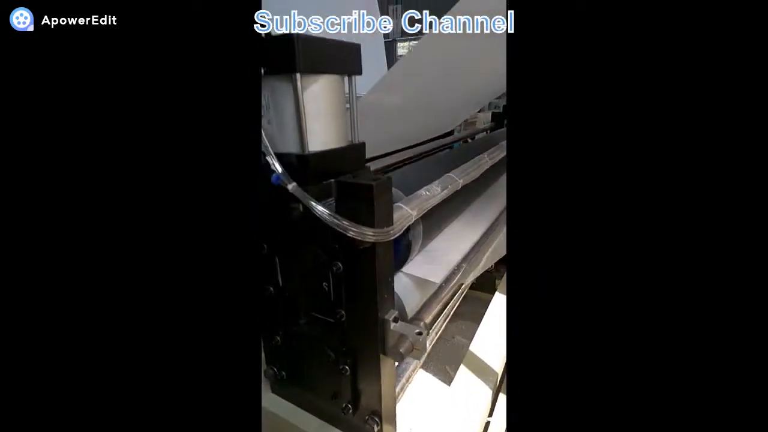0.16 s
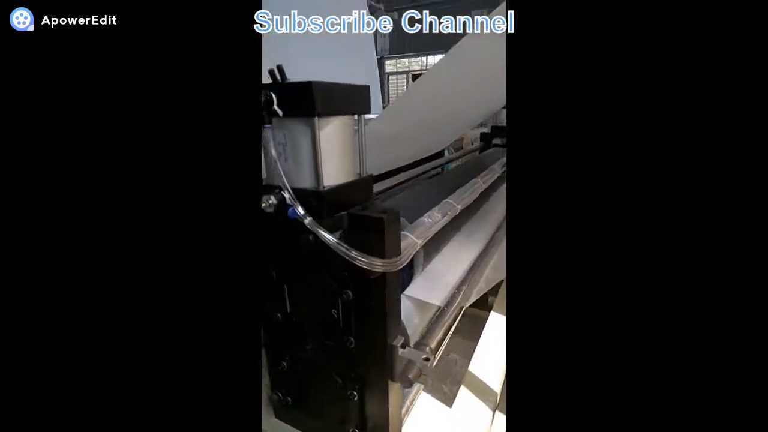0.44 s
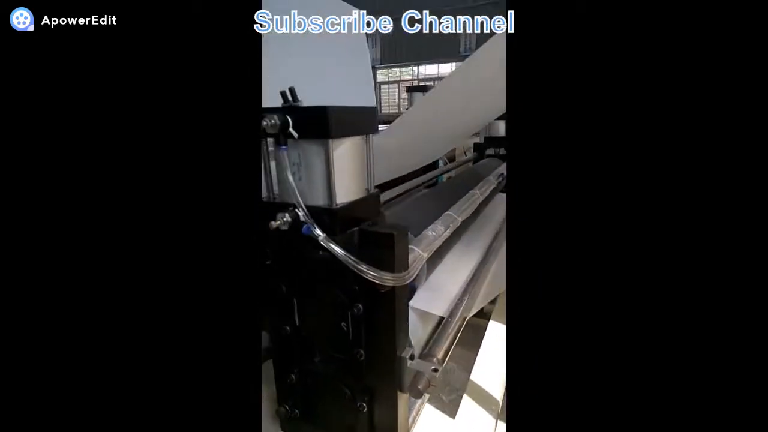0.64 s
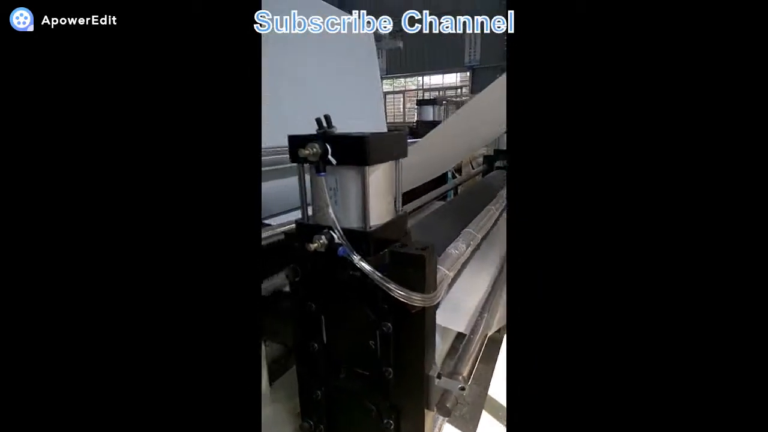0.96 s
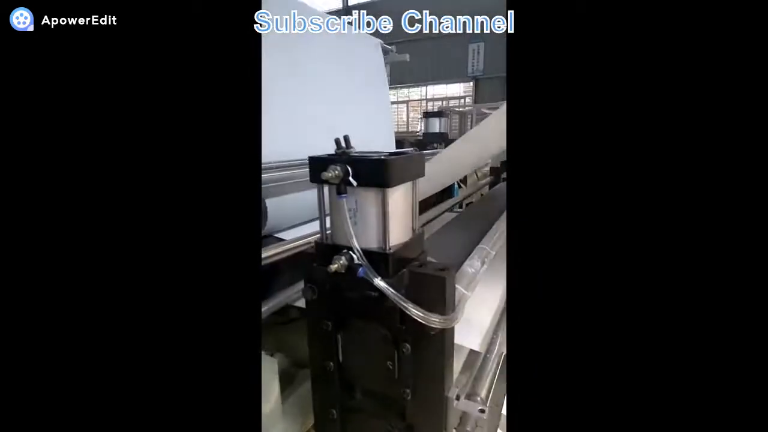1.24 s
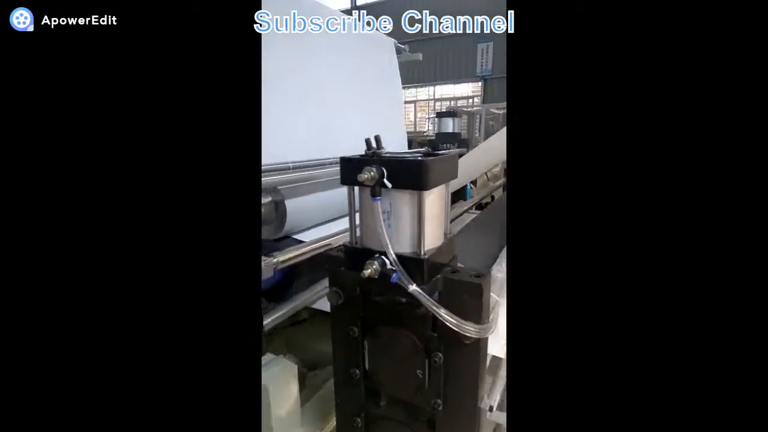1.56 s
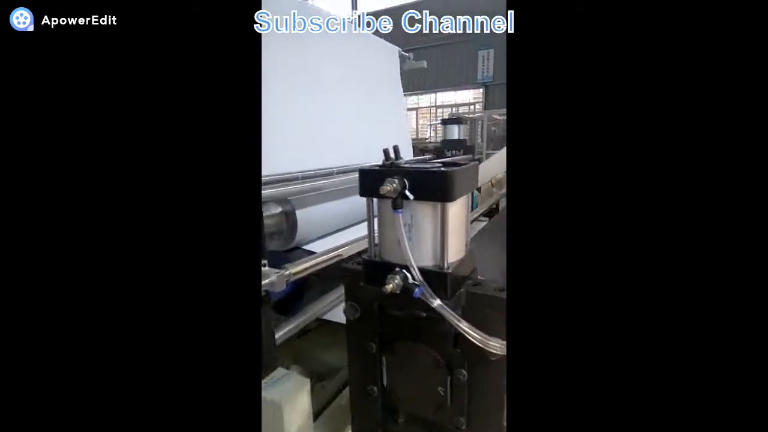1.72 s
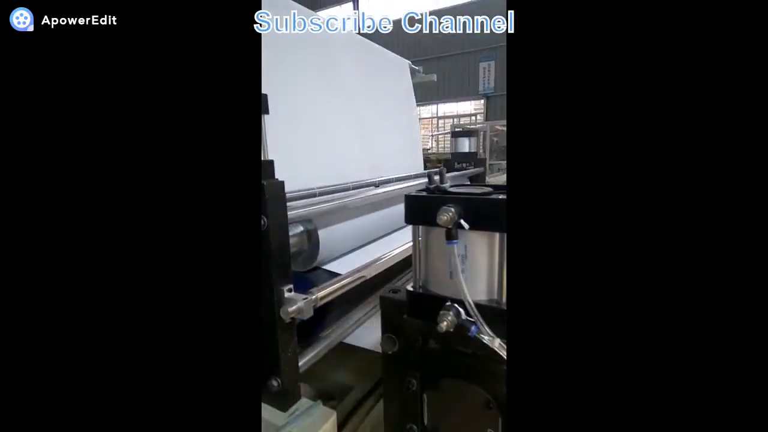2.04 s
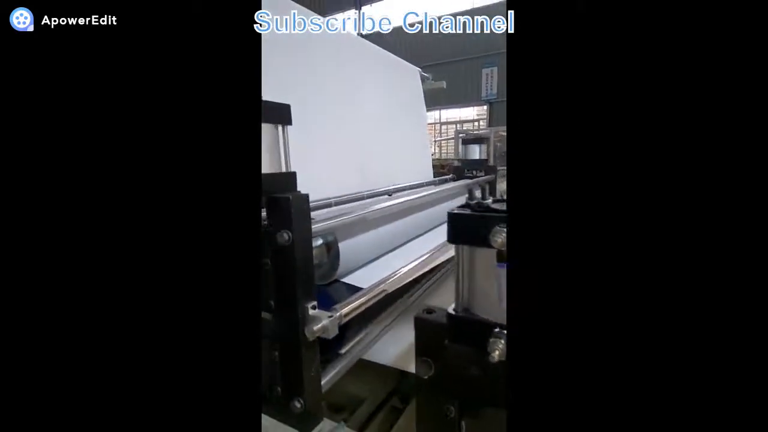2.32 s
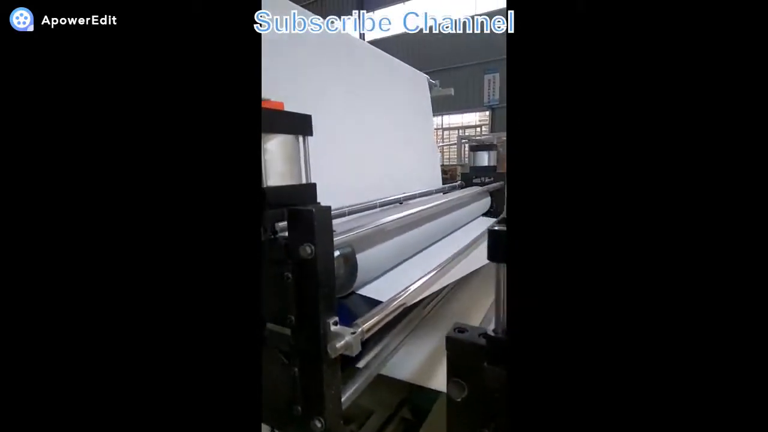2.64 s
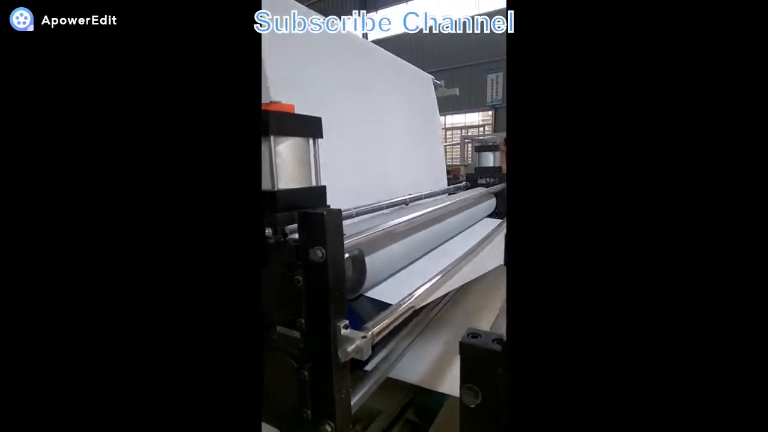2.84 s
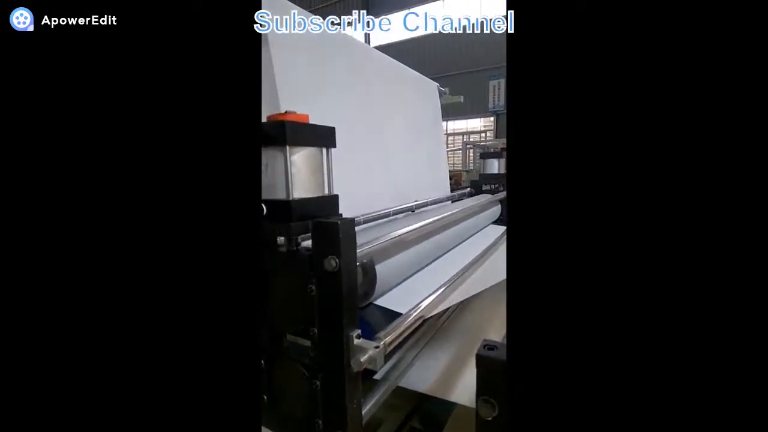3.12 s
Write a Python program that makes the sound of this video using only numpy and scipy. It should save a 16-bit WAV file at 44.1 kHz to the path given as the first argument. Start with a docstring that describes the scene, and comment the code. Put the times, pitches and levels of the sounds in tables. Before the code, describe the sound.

A paper folding machine clacks about seven times a second, each clack answered by a lighter metallic knock and papery swish, over motor hum and roller rumble in a factory hall, heard close by a moving microphone.

```python
"""In a factory hall, a tissue folding machine runs while the microphone moves along its side.
The rollers rumble as coloured noise with ticks; a motor hum and a thin inverter whine are wavering tones.
Seven times a second the folder clacks and knocks back: short noise bursts and ringing metal tones,
with a swish of paper made of grainy noise. Once, compressed air puffs out; dull thumps come from the frame."""
import sys
import numpy as np
from scipy import signal
from scipy.fft import rfft, irfft
from scipy.io import wavfile
from scipy.ndimage import uniform_filter1d

SR = 44100
rng = np.random.default_rng(int(sys.argv[2]) if len(sys.argv) > 2 else 0)


def to_wav(s):
    """Save 16-bit WAV."""
    ch = np.atleast_2d(s).T  # columns
    pcm = np.round(np.clip(ch, -1, 1) * 32767)  # PCM
    wavfile.write(sys.argv[1], SR, pcm.astype(np.int16))


N = 144648  # length in samples

# Rumble of the rollers and the hall. Each row: frequency in Hz, relative level in dB.
HALL_COLOUR = [(20, -32), (40, -11), (60, -14), (110, 4), (145, -3.5), (180, 2.5), (215, -7.5), (255, 1),
               (300, -6.5), (370, -0.5), (520, -5), (660, -6), (850, -10), (1400, -13), (2100, -14),
               (3000, -17.5), (4200, -20.5), (7000, -20.5), (8200, -32), (10000, -31.5), (13000, -29),
               (16000, -51)]
# Likeness of left and right. Each row: frequency in Hz, likeness from 0 to 1.
LEFT_RIGHT_LIKENESS = [(20, .98), (150, 0.88), (350, 0.9), (700, 0.51), (1400, 0), (3000, 0), (8000, 0.22),
                       (14000, 0.38)]
# Colour of the loose parts' ticks. Each row: frequency in Hz, relative level in dB.
RATTLE_COLOUR = [(200, -7), (400, -7), (700, -5), (1200, -2.5), (2300, -22), (4000, -19), (8000, -17),
                 (16000, -36)]
# Reverberation of the hall. Each row: frequency in Hz, time to fall by 60 dB in seconds.
ROOM_DECAY = [(200, 0.94), (2000, 0.72), (8000, 0.14), (16000, 0.37)]
# Midrange of rollers and blows as the microphone passes. Each row: time in seconds, level in dB.
MIDRANGE_LEVEL = [(0, 1.5), (.4, 0), (.7, 0), (1.2, 0), (1.45, -1), (2, -0.5), (2.6, -0.5), (3.28, -0.5)]
# A narrow moan in the rollers that comes and goes. Each row: time in seconds, level in dB.
MOAN_LEVEL = [(0, -42), (.15, -33), (.4, -32.5), (.85, -41), (1.12, -27.5), (1.45, -38), (1.78, -40),
              (1.96, -25.5), (2.15, -33), (2.35, -49), (3.28, -48)]
# The folding parts whirr between the blows, most at first. Each row: time in seconds, level in dB.
WHIRR_LEVEL = [(0, -32.5), (.6, -34), (1.3, -34), (3.28, -35.5)]
# Tones of the inverter. Each row: frequency in Hz, level in dB.
WHINE_TONES = [(7892, -42.5), (7963, -42), (8036, -47), (8109, -45)]
# Level of the whine along the way. Each row: time in seconds, level in dB.
WHINE_PATH = [(0, -23), (.35, 2), (.9, 1.5), (1.4, 0), (1.9, -1), (2.3, -0.5), (2.6, 0), (2.95, 2),
              (3.28, -7)]
# Other shafts droning in the frame. Each row: frequency in Hz, level in dB.
DRONE_TONES = [(80.2, -37), (92.3, -34.5), (99.4, -35.5), (101.7, -32)]
# Motor hum. Each row: multiple of the shaft rate, level in dB.
HUM_TONES = [(1, -29), (2, -10.5), (4, -38), (12, -45)]
# The main hum tone swells as the motor comes nearer. Each row: time in seconds, level in dB.
HUM_SWELL = [(0, -1), (.25, -0.8), (.48, 0.6), (1.05, 0.2), (1.35, 1), (1.53, 1.5), (2, 1.4), (2.5, 2),
             (3.28, 1.9)]
# Overtones of the hum that sing out of the frame, listed as multiples of the shaft rate.
OVERTONE_MULTIPLES = (7, 9, 10)
# Their levels along the way. Each row: time in seconds, then the level of each multiple in dB.
OVERTONE_PATH = [(0, -32, -49, -38), (.35, -29.5, -46, -39), (.8, -43, -44, -42), (1.05, -30.5, -32, -42),
                 (1.35, -31.5, -37.5, -44), (1.7, -38, -35, -41), (1.95, -36, -34, -31),
                 (2.2, -42, -33.5, -44), (2.75, -35, -35.5, -48), (3.28, -43, -35, -40)]
# Dull thumps in the frame. Each row: start in seconds, relative level in dB.
FRAME_THUMPS = [(.409, 1.5), (1.114, 5), (1.256, 2), (2.245, 4.5), (2.662, -8), (3.141, -2.5), (3.229, -3),
                (0.124, 1), (0.809, -2)]
# Colour of a thump. Each row: frequency in Hz, relative level in dB.
THUMP_COLOUR = [(80, -11), (180, 5), (280, 0), (480, -16), (800, -11), (2000, -53)]
# Colour of the air puff. Each row: frequency in Hz, relative level in dB.
PUFF_COLOUR = [(400, -26), (1200, -3.5), (2500, -4), (3700, 1.5), (5000, -4), (7000, 1.5), (9000, -5),
               (12000, -15), (16000, -15)]
# Spurts within the air puff. Each row: start in seconds, level in dB.
PUFF_SPURTS = [(2.814, -21), (2.823, -16), (2.83, -16), (2.839, -14), (2.859, -18)]
# Folding clacks. Each row: start in seconds, relative crack level in dB, relative ring level in dB,
# ring pitch in Hz, delay of the rebound in seconds, relative rebound level in dB.
FOLD_CLACKS = [(0.063, -6.5, -6, 2080, 0.016, -9), (0.206, -11, -1, 2100, 0.02, -3),
               (0.345, -5, -1.5, 1980, 0.018, -5), (0.485, -10, -2, 2110, 0.017, -5),
               (0.631, -6.5, 1.5, 2060, 0.019, -3), (0.77, -4.5, 0, 2050, 0.018, -5),
               (0.911, -4.5, 0.5, 2080, 0.015, -7), (1.054, -5, 3.5, 2055, 0.019, 0),
               (1.19, -4.5, -2.0, 1965, 0.02, -3.5), (1.332, -4, 2, 1983, 0.021, -12),
               (1.477, -3.5, 1.5, 2072, 0.017, -3), (1.613, -1, -0.5, 2060, 0.021, -3),
               (1.755, -3, -1.5, 1930, 0.021, -6), (1.898, 2.5, 1.5, 2040, 0.019, 1.0),
               (2.035, -4.5, 1.5, 1940, 0.023, -4), (2.177, -0.5, -3, 2080, 0.016, -5.5),
               (2.32, 0.5, 1, 2040, 0.022, 0), (2.459, -0.5, 2, 2040, 0.023, -2.5),
               (2.6, 2, -2, 2040, 0.016, -4.0), (2.741, 1.5, 2, 2096, 0.022, 1.5),
               (2.882, -1, 0, 1960, 0.022, -1), (3.023, 3, -2, 2210, 0.015, -4.0),
               (3.165, 0.5, 1, 2070, 0.022, 0.5)]
# Return knocks between the clacks. Each row: start in seconds, relative level in dB,
# ring pitch in Hz, relative bounce level in dB.
RETURN_KNOCKS = [(0.146,-4,2330,-2), (0.289,-4,2140,-8), (0.421,-6,2050,-6), (0.569,-6,2340,-6),
                 (0.708,-4,2210,-5), (0.846,-2.5,2140,-2), (0.99,-4,2350,-2.5), (1.129,-3,2180,-5),
                 (1.271,-2,2135,-5), (1.416,-2.5,2350,-8), (1.55,-1.5,2200,-5), (1.693,1,2270,-4),
                 (1.836,-2,2320,-1), (1.972,0.5,2150,-2.5), (2.119,1,2140,-4), (2.255,-2.5,2305,-1.5),
                 (2.395,-2,2210,-3), (2.537,2,2180,-3), (2.678,-2,2330,-1), (2.823,-6,2220,-10),
                 (2.96,2,2120,-4.5), (3.102,0,2290,-1), (3.241,-3,2150,-6)]
# Ringing of the folding parts. Each row: frequency in Hz before tuning to a blow, relative level
# at a clack in dB, relative level at a return in dB, time to fall by 60 dB in seconds.
RING_MODES = [(1400, -7, -11.5, 0.02), (1762, -0.5, -10.5, 0.025), (2040, 1, -3.5, 0.035),
              (2260, -12, 1.5, 0.031), (2453, -8, -4.5, 0.024), (2836, -7, -11.5, 0.044)]
# Colour of a clack's crack. Each row: frequency in Hz, relative level in dB.
CRACK_COLOUR = [(300, -18), (900, -13), (1600, 4), (3000, 1.5), (4300, 1), (5600, 3), (6600, -1),
                (7500, -7), (9000, -11.5), (11600, -8.5), (16000, -18)]
# Colour of the paper swish. Each row: frequency in Hz, relative level in dB.
SWISH_COLOUR = [(500, -25), (1500, 4), (3000, 8), (6500, 11), (8500, 11), (11000, -2.5), (16000, -44)]

HALL_DB, RATTLE_DB, ROOM_DB = -20, -37, -14.5
RATTLE_PER_S, RATTLE_SPREAD_DB = 140, 6
MOAN_HZ, MOAN_WIDTH_HZ, MOAN_WANDER_HZ = 653.5, 9, 7.04
WHIRR_HZ, WHIRR_WIDTH_HZ = 2250, 290
WHINE_HISS_HZ, WHINE_HISS_WIDTH_HZ, WHINE_HISS_DB = 8070, 110, -39.5
SHAFT_HZ = 62.955
THUMP_DB, PUFF_DB, PUFF_S = -20, -19.3, 2.806
# levels of the folder's parts, to which each blow's own level is added
CRACK_DB, SNAP_DB, RING_DB, REBOUND_DB, RETURN_DB = -21.5, -18.5, -23, -20, -21
RATTLE_ON_DB = -26  # the rattle after a clack
FEED_DB, SWISH_DB = -27.5, -28
SNAP_GAP_S, SECOND_SNAP_DB = .0042, -4
STRIKE_S, CHATTER = .0032, .48  # fall time and share of the chatter in a blow
PEAK_KNEE, PEAK_CEILING = .8, .96  # sample values where rounding starts and levels out
EDGE_HZ = 15900


def amp(db):
    """Turns decibels into gain."""
    return 10 ** (np.asarray(db) / 20)


def unit(x):
    """Scales a sound to an average strength (rms) of 1."""
    return x / np.sqrt(np.mean(x ** 2) + 1e-20)


def read(points, hz):
    """Reads a table between its rows, along a logarithmic frequency axis."""
    f, value = np.transpose(points)
    return np.interp(np.log(hz + 1), np.log(f + 1), value)


def gain_over_time(points):
    """Turns a table of times and decibels into a gain for every sample."""
    return amp(np.interp(np.arange(N) / SR, *np.transpose(points)))


def add(mix, s, sound):
    """Mixes in a stereo sound, starting at s seconds."""
    part = mix[:, max(round(s * SR), 0):][:, :sound.shape[1]]
    part += sound[:, :part.shape[1]]


def drift(rate_hz):
    """Makes a slow random wander of rms 1, by keeping only the low frequencies of noise."""
    hz = np.fft.rfftfreq(N, 1 / SR)
    slow = np.exp(-(hz / rate_hz) ** 2) * (hz > 0)
    return unit(irfft(rfft(rng.standard_normal(N)) * slow, N))


def colour(x, spectrum):
    """Gives two unrelated channels a spectrum and makes left and right partly alike."""
    hz = np.fft.rfftfreq(x.shape[1], 1 / SR)
    a, b = rfft(x) * amp(read(spectrum, hz))
    same = np.clip(read(LEFT_RIGHT_LIKENESS, hz), -1, 1)
    mid, side = a * np.sqrt(1 + same), b * np.sqrt(1 - same)
    return unit(irfft(np.array([mid + side, mid - side]), x.shape[1]))


def band(centre_hz, width_hz):
    """Makes stereo noise in one narrow resonance."""
    hz = np.fft.rfftfreq(N, 1 / SR)
    peak = 1 / (1 + ((hz - centre_hz) / width_hz) ** 4)
    return colour(irfft(rfft(rng.standard_normal((2, N))) * peak, N), HALL_COLOUR)


def tone(hz, waver, wander):
    """Makes a steady tone that wavers in level and wanders in phase."""
    angle = 2 * np.pi * (hz * np.arange(N) / SR + rng.random())
    level = np.sqrt(2) * (1 + waver * drift(18))
    return level * np.sin(angle + wander * drift(2.7))


def burst(spectrum, rise, hold, fall, grain_db=0):
    """Makes coloured noise, grainy if asked, that rises, holds and dies away (times in seconds)."""
    t = np.arange(SR // 2) / SR
    grains = unit(uniform_filter1d(rng.standard_normal(len(t)), size=48))
    noise = amp(grain_db * np.tanh(grains)) * rng.standard_normal((2, len(t)))
    shape = np.minimum(t / rise, 1) * np.exp(-np.maximum(t - rise - hold, 0) / fall)
    return shape * colour(noise, spectrum)


def ring(levels_db, top_hz, scatter=.02):
    """A blow and a short chatter set the folding parts ringing, the strongest tone near top_hz."""
    t = np.arange(SR // 8) / SR
    hz, _, _, t60 = np.transpose(RING_MODES)[:, :, None]
    hz = hz * top_hz / hz[np.argmax(levels_db)]
    hz = hz * (1 + scatter * rng.standard_normal(hz.shape))
    # the phases differ between left and right
    phase = rng.uniform(0, 2 * np.pi, hz.shape) + .9 * rng.standard_normal((2, *hz.shape))
    fading = amp(levels_db[:, None] - 60 * t / t60)
    modes = (fading * np.sin(2 * np.pi * hz * t + phase)).sum(1)
    modes *= np.minimum(t / .001, 1)  # soft start over 1 ms
    chatter = rng.standard_normal((2, len(t))) * np.exp(-t / STRIKE_S)
    contact = (t == 0) + CHATTER * chatter / np.linalg.norm(chatter[0])
    out = signal.fftconvolve(modes, contact, axes=1)[:, :len(t)]
    return out / np.sqrt(np.mean(out[:, :SR // 200] ** 2))  # rms 1 over the first 5 ms


def room(x):
    """The hall's echoes blur into a noise tail that dies at its own speed in each pitch range."""
    hz, t, z = signal.stft(rng.standard_normal((2, SR // 2)), SR, nperseg=256)
    fading = amp(-60 * t / read(ROOM_DECAY, hz)[:, None])
    tail = signal.istft(z * fading, SR, nperseg=256)[1]
    return signal.fftconvolve(x, tail / np.linalg.norm(tail[0]), axes=1)[:, :N]


def uneven(x, patchy_db=2):
    """The midrange follows the microphone's path and the treble flickers in small patches."""
    hz, t, z = signal.stft(x, SR, nperseg=512)
    # how strongly each frequency takes part: (Hz, share)
    middle = read([(180, 0), (380, 1), (1400, 1), (3500, 0)], hz)[:, None]
    treble = read([(1000, 0), (4000, .6), (9000, 1.4)], hz)[:, None]
    patches = rng.standard_normal((len(t), len(hz))).T
    patches = uniform_filter1d(patches, size=4, axis=0)
    patches = unit(uniform_filter1d(patches, size=9, axis=1))
    change_db = middle * np.interp(t, *np.transpose(MIDRANGE_LEVEL)) + treble * patchy_db * patches
    return signal.istft(z * amp(change_db), SR, nperseg=512)[1][:, :N]


def rollers(flutter_db=.55):
    """The running rollers rumble and hiss as fluttering coloured noise."""
    rumble = colour(rng.standard_normal((2, N)), HALL_COLOUR)
    return amp(HALL_DB) * rumble * amp(flutter_db * drift(75))


def loose_parts(tick_s=.0015):
    """Loose parts tick at random moments, each tick a tiny noise that dies away."""
    sizes = np.minimum(rng.exponential(1, N), 2)
    ticks = (rng.random(N) < RATTLE_PER_S / SR) * amp(RATTLE_SPREAD_DB * sizes)
    shape = signal.lfilter([1], [1, -np.exp(-1 / (tick_s * SR))], ticks)
    return amp(RATTLE_DB) * colour(shape * rng.standard_normal((2, N)), RATTLE_COLOUR)


def moan():
    """A narrow resonance in the rollers moans, its pitch wandering a little."""
    wander = np.exp(2j * np.pi * np.cumsum(MOAN_WANDER_HZ * drift(3.9)) / SR)
    shifted = (signal.hilbert(band(MOAN_HZ, MOAN_WIDTH_HZ)) * wander).real
    return shifted * gain_over_time(MOAN_LEVEL)


def whirr():
    """The folding parts whirr as a wider band of noise between the blows."""
    return band(WHIRR_HZ, WHIRR_WIDTH_HZ) * gain_over_time(WHIRR_LEVEL)


def inverter(balance_db=1.2):
    """The inverter whines: a cluster of slightly wavering high tones in a narrow hiss."""
    lines = np.array([sum(amp(db) * tone(hz, .25, .6) for hz, db in WHINE_TONES) for side in range(2)])
    hiss = amp(WHINE_HISS_DB) * band(WHINE_HISS_HZ, WHINE_HISS_WIDTH_HZ)
    return (lines + hiss) * gain_over_time(WHINE_PATH) * amp([[balance_db], [-balance_db]])


def motor(balance_db=.42):
    """The motor hums at multiples of its shaft rate, most at twice; other shafts drone along."""
    out = np.zeros(N)
    for multiple, db in HUM_TONES:
        if multiple == 2:  # the main tone is steadier and swells
            out += amp(db) * gain_over_time(HUM_SWELL) * tone(multiple * SHAFT_HZ, .0074, .017)
        else:
            out += amp(db) * tone(multiple * SHAFT_HZ, .19, .35)
    times, *levels = np.transpose(OVERTONE_PATH)
    for multiple, db in zip(OVERTONE_MULTIPLES, levels):
        out += gain_over_time(np.transpose([times, db])) * tone(multiple * SHAFT_HZ, .33, .48)
    for hz, db in DRONE_TONES:
        out += amp(db) * tone(hz, .53, .9)
    return out * amp([[-balance_db], [balance_db]])


def thumps():
    """A few dull thumps in the frame, each a short burst of low noise."""
    out = np.zeros((2, N))
    for s, db in FRAME_THUMPS:
        add(out, s, amp(THUMP_DB + db) * burst(THUMP_COLOUR, .002, .0041, .0064))
    return out


def air_puff():
    """Compressed air puffs out once: a grainy hiss that splutters in short spurts."""
    out = np.zeros((2, N))
    add(out, PUFF_S, amp(PUFF_DB) * burst(PUFF_COLOUR, .015, .045, .09, grain_db=3.5))
    for s, db in PUFF_SPURTS:
        add(out, s, amp(db) * burst(PUFF_COLOUR, .001, .003, .003))
    return out


def clacks():
    """In each cycle paper feeds in, then the folder cracks, snaps twice, rings and rebounds."""
    out = np.zeros((2, N))
    clack_db = np.transpose(RING_MODES)[1]
    for s, db, ring_db, hz, rebound_s, rebound_db in FOLD_CLACKS:
        feed = burst(SWISH_COLOUR, .02, .015, .016)
        crack = burst(CRACK_COLOUR, .002, .0065, .01, grain_db=3.5)
        rattle_on = burst(CRACK_COLOUR, .019, .0073, .0055, grain_db=6)
        add(out, s - .022, amp(FEED_DB) * feed)
        add(out, s - .001, amp(CRACK_DB + db) * crack)
        add(out, s, amp(RATTLE_ON_DB + .5 * db) * rattle_on)
        for lag, stroke_db in ((0, 0), (SNAP_GAP_S, SECOND_SNAP_DB)):
            snap = burst(CRACK_COLOUR, .00037, .0011, .0017)
            add(out, s + .002 + lag, amp(SNAP_DB + db + stroke_db) * snap)
            add(out, s + .00294 + lag, amp(RING_DB + ring_db) * ring(clack_db, hz))
        add(out, s + rebound_s, amp(REBOUND_DB + rebound_db) * ring(clack_db, hz))
    return out


def return_knocks():
    """Between clacks the folder knocks back and bounces, ringing, with a swish of paper."""
    out = np.zeros((2, N))
    return_db = np.transpose(RING_MODES)[2]
    for s, db, hz, bounce_db in RETURN_KNOCKS:
        swish = burst(SWISH_COLOUR, .0083, .015, .019, grain_db=4)
        add(out, s - .013, amp(SWISH_DB) * swish)
        add(out, s, amp(RETURN_DB + db) * ring(return_db, hz))
        add(out, s + .012, amp(RETURN_DB + bounce_db) * ring(return_db, hz))
    return out


def scene(balance_db=.18):
    """Puts the machine in its hall; only the blows and the air get the echo tail."""
    hits = thumps() + air_puff() + clacks() + return_knocks()
    background = rollers() + loose_parts()
    works = uneven(hits + amp(ROOM_DB) * room(hits) + background) + moan() + whirr()
    return works * amp([[balance_db], [-balance_db]]) + inverter() + motor()


def record(dry):
    """Rounds off the highest peaks, then removes what lies above the band edge."""
    over = np.maximum(abs(dry) - PEAK_KNEE, 0)
    headroom = PEAK_CEILING - PEAK_KNEE
    soft = dry + np.sign(dry) * (headroom * np.tanh(over / headroom) - over)
    low_pass = signal.firwin(511, EDGE_HZ, window=("kaiser", 9), fs=SR)
    return signal.oaconvolve(soft, low_pass[None], "same")


dry = scene()
out = record(dry)
to_wav(out)
```